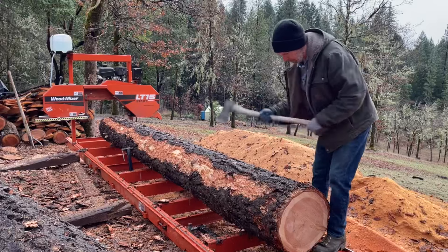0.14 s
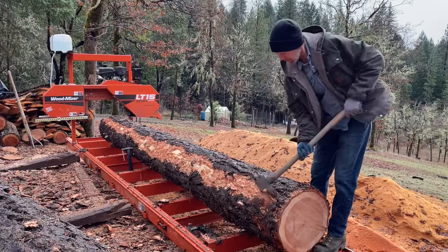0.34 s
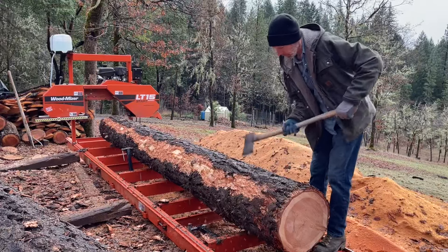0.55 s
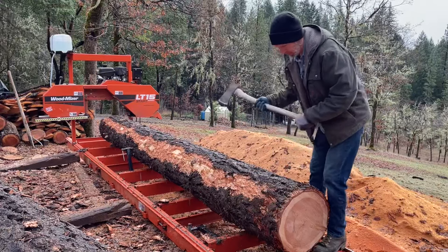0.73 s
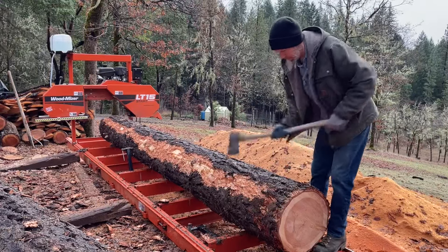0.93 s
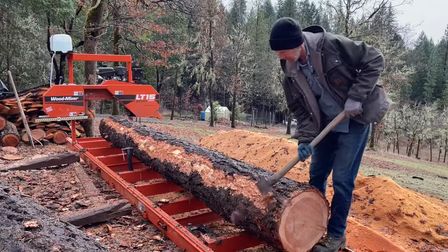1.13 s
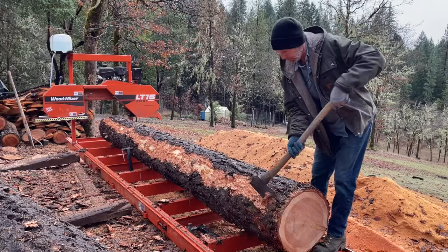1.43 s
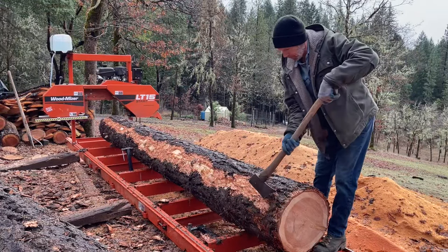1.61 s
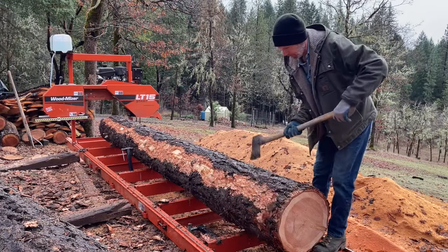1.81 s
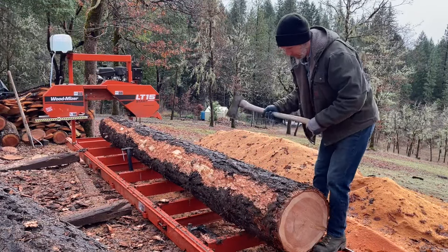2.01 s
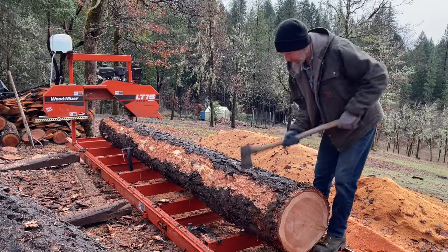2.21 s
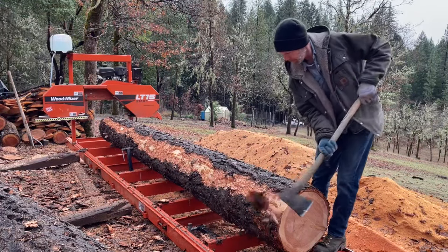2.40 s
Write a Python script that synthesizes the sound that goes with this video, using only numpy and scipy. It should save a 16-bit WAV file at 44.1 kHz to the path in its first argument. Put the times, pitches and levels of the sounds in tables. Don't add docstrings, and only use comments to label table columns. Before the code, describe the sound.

An axe chops bark off a log three times, with low ringing thuds and scattering chips

```python
import sys
import numpy as np
from scipy import signal
from scipy.fft import rfft, irfft, next_fast_len
from scipy.io import wavfile
from scipy.ndimage import uniform_filter1d, map_coordinates

SR = 44100
rng = np.random.default_rng(int(sys.argv[2]) if len(sys.argv) > 2 else 0)


def gain_from_decibels(decibels):
    exponent = np.asarray(decibels, float) / 20
    return 10 ** exponent


def transcribe(signal):
    frames = np.atleast_2d(signal).T
    limited = np.clip(frames, -1, 1)
    pcm = np.round(limited * 32767).astype(np.int16)
    wavfile.write(sys.argv[1], SR, pcm)


N = 112454


def unit(x):
    return x / np.sqrt(np.mean(x ** 2) + 1e-20)


def along(points, hz):
    f, v = np.transpose(points)
    return np.interp(np.log(hz + 1), np.log(f + 1), v)


def wobble(rate):
    knots = rng.standard_normal(int(N * rate / SR) + 4)
    return map_coordinates(knots, [np.arange(N) * rate / SR])


def filtered(x, response):
    m = next_fast_len(len(x) + 4096)
    return irfft(rfft(x, m) * response(np.fft.rfftfreq(m, 1 / SR)), m)[:len(x)]


def peak(f, hz, width_hz):
    return 1j * f * width_hz / (hz * hz - f * f + 1j * f * width_hz + 1e-9)


def add(out, s, x):
    i = max(round(s * SR), 0)
    out[i:i + len(x)] += x[:len(out) - i]


def grains(rate_per_s, size):
    hits = rng.random(size) < rate_per_s / SR
    sign = rng.choice([-1, 1], size)
    spike_db = 2.5 * np.minimum(rng.exponential(size=size), 3.5)
    return hits * sign * gain_from_decibels(spike_db)


def ringing(hz, t, waver):
    start = rng.random()
    pitch = hz * (1 + waver * wobble(40)[:len(t)])
    return np.sin(2 * np.pi * (start + np.cumsum(pitch) / SR))


def ticks(rows, t60, gain_db, sharp, tone):
    out, t = np.zeros(N), np.arange(SR // 20) / SR
    for s, db, hz in rows:
        def body(f):
            return tone * peak(f, hz, hz / sharp) * peak(f, hz, hz) + 0.5 * peak(f, hz, 2.6 * hz) ** 2
        click = filtered(rng.standard_normal(len(t)) * gain_from_decibels(-60 * t / t60), body)
        add(out, s, gain_from_decibels(db + gain_db) * click / np.abs(click).max())
    return out


# frequency in Hz, level in dB.
AIR_COLOUR = [(12, -41.5), (30, -6), (169, -8), (258, -13.5), (750, -17), (966, -20), (8170, -38.5),
              (14300, -48.5), (16200, -63)]


def air():
    sway = gain_from_decibels(wobble(4))
    return gain_from_decibels(-61) * sway * unit(filtered(rng.standard_normal(N), lambda f: gain_from_decibels(along(AIR_COLOUR, f))))


# centre in seconds, level in dB, length in seconds.
SLEEVE_MOVES = [
    (0.034, -58.5, 0.24),
    (0.147, -66, 0.089),
    (0.592, -64.5, 0.064),
    (0.691, -56, 0.15),
    (0.891, -60.5, 0.14),
    (1.648, -62.5, 0.13),
    (1.74, -75, 0.051),
    (1.963, -60, 0.089),
    (2.031, -60.5, 0.045),
    (2.114, -65, 0.073),
]
# frequency in Hz, level in dB.
CLOTH_COLOUR = [(180, -44), (300, -0.5), (603, -8.5), (1100, -11), (1390, -10), (7320, -24), (16000, -36)]


def jacket():
    t = np.arange(N) / SR
    moves = sum(gain_from_decibels(db) * np.exp(-((t - s) / length * 2) ** 2) for s, db, length in SLEEVE_MOVES)
    uneven = gain_from_decibels(3.5 * wobble(40) + 3.3 * wobble(140))
    rub = unit(filtered(rng.standard_normal(N), lambda f: gain_from_decibels(along(CLOTH_COLOUR, f))))
    tick = gain_from_decibels(-60 * np.arange(400) / SR / 0.008)
    fuzz = np.zeros(N)
    for hz in (2200, 4000, 6500, 8500, 12000):
        bursts = np.convolve(abs(grains(25, N)), tick)[:N] * rng.standard_normal(N)
        fuzz += filtered(bursts, lambda f: peak(f, hz, hz / 2) ** 2)
    return moves * uneven * rub + gain_from_decibels(-20) * (moves + gain_from_decibels(-65.5)) * unit(fuzz)


# centre in seconds, level in dB, frequency in Hz, length in seconds.
FLAPS_AND_BUMPS = [(0.093, -37, 593, 0.004), (0.117, -48, 80, 0.07), (0.279, -33.5, 50, 0.052),
                   (0.412, -48.5, 417, 0.0072), (0.668, -43.5, 78.8, 0.067), (0.724, -52, 91, .04),
                   (0.871, -47, 87.4, 0.065), (.872, -45, 700, 0.0048), (0.919, -44, 50, 0.055),
                   (1.5, -56, 91, 0.052), (1.652, -51.5, 120, 0.037), (1.683, -53.5, 200, 0.011),
                   (1.893, -51.5, 124.2, 0.03), (1.932, -47.5, 106.4, 0.027), (1.973, -53, 199, 0.028),
                   (2.153, -61.5, 880, 0.043), (2.213, -55.5, 90.3, 0.052), (2.381, -42, 55.3, 0.055),
                   (2.412, -52, 615, 0.015), (1.257, -51, 307, 0.015), (1.421, -54, 110, 0.11),
                   (0.378, -55, 65, 0.13), (0.179, -47.5, 150, .04), (1.393, -45, 380, 0.015)]


def flaps():
    half_s = 1 / 8
    out, t = np.zeros(N), np.arange(SR // 4) / SR - half_s
    for s, db, hz, length in FLAPS_AND_BUMPS:
        noise = filtered(rng.standard_normal(len(t)), lambda f: peak(f, hz, hz * 1.76) ** 2)
        puff = unit(noise) * np.exp(-(t / length * 2) ** 2)
        cut = max(round((half_s - s) * SR), 0)
        add(out, s - half_s, gain_from_decibels(db) * puff[cut:])
    return out


# start in seconds, peak level in dB, frequency in Hz.
FALLING_CRUMBS = [(.016, -49.5, 5970), (.034, -49, 7500), (.062, -45.5, 6000), (.0916, -49.5, 1646),
                  (.142, -44, 7500), (.1261, -51.5, 7400), (.177, -45, 6500), (.2405, -31.5, 8500),
                  (.273, -30, 6820), (.3263, -40, 6980), (.3496, -29.5, 5710), (.525, -59, 8500),
                  (.5596, -48, 8980), (.6464, -53, 9000), (.8534, -51.5, 6340), (.8898, -49.5, 8000),
                  (.608, -42.5, 2480), (.6393, -50, 7430), (.6938, -44.5, 4370), (.7695, -39, 2780),
                  (.7883, -54.5, 7440), (.869, -61.5, 1590), (.939, -39, 4875), (1.044, -46.5, 4500),
                  (1.2471, -37.5, 5500), (1.5354, -50, 3200), (1.5606, -53, 2820), (1.5969, -49, 3300),
                  (1.5822, -56, 4190), (1.65, -51.5, 6240), (1.731, -54, 3570), (1.9093, -48.5, 3480),
                  (1.936, -53, 4400), (1.989, -57, 4400), (1.9564, -46.5, 6940), (1.9682, -41.5, 2990),
                  (2.02, -43, 2500), (2.0583, -54, 5930), (2.12, -52, 3510), (2.162, -51.5, 4350),
                  (2.371, -47.5, 4000)]


def crumbs():
    return ticks(FALLING_CRUMBS, t60=0.011, gain_db=2, sharp=2.5, tone=0.65)


# start in seconds, length in seconds, level in dB, fall over that length in dB, centre in Hz.
CHIP_SHOWERS = [
    (0.238, 0.13, -49.5, 12, 2437),
    (0.972, 0.12, -50.5, 9.5, 2000),
    (2.261, 0.091, -54.5, 12, 2200),
    (2.363, 0.043, -60, 1.5, 2650),
    (1.243, 0.036, -51.5, 19.5, 1800),
    (1.318, 0.094, -51.5, 7, 3293),
    (1.336, 0.074, -49, 2, 700),
    (1.412, 0.088, -58.5, 4, 1300),
    (1.457, 0.061, -54.5, 20, 2770),
]


def showers():
    n = SR // 4
    out, t = np.zeros(N), np.arange(n) / SR
    for s, length, db, fall_db, hz in CHIP_SHOWERS:
        bits = np.zeros(n)
        for c in hz * np.exp(0.9 * np.arange(-1, 2)):
            bits += filtered(grains(4000 / 3, n), lambda f: peak(f, c, c / 2.5) * peak(f, c, c))
        hiss = filtered(rng.standard_normal(n), lambda f: peak(f, hz / 2, 3 * hz) * peak(f, hz, 4 * hz))
        onset = np.clip(t / 0.0058, 0, 1)
        ending = gain_from_decibels(-np.maximum(t - length, 0) * 600)
        add(out, s, gain_from_decibels(db - fall_db * t / length) * onset * ending * (unit(bits) + unit(hiss)))
    return out


# start in seconds, level in dB.
BLADE_TAPS = [
    (1.248, -38.5),
    (1.2626, -40),
    (1.293, -52.5),
]
# frequency in Hz, level in dB, t60 in seconds.
HEAD_MODES = [(420, -7, 0.027), (536, -14.5, 0.17), (960, -4.5, 0.087), (1023, -9, 0.14)]


def tap():
    out, t = np.zeros(N), np.arange(SR // 4) / SR
    for s, tap_db in BLADE_TAPS:
        ring = sum(gain_from_decibels(tap_db + db - 60 * t / t60) * ringing(hz, t, 0.019) for hz, db, t60 in HEAD_MODES)
        add(out, s, ring * (1 - np.exp(-t / 0.0011)))
    return out


# start in seconds, peak level in dB, frequency in Hz.
BARK_SNAPS = [(1.2478, -37, 2447), (1.3036, -46, 5500), (1.3283, -35, 3640), (1.3398, -20, 3390),
              (1.3406, -16, 3367), (1.3455, -37, 3600), (1.3483, -31, 3340), (1.3563, -19, 3280),
              (1.3605, -22, 3000), (1.3652, -28, 5000), (1.372, -33, 3410), (1.3812, -29.5, 1950),
              (1.386, -24.5, 3320), (1.3918, -23.5, 2010), (1.399, -20, 2920), (1.403, -31, 3090),
              (1.4062, -30, 2920), (1.4645, -35, 2930), (1.472, -37.5, 3500), (1.486, -37.5, 3350),
              (1.49, -35, 3180), (1.509, -42, 3500)]


def snaps():
    return ticks(BARK_SNAPS, t60=0.005, gain_db=0, sharp=5, tone=1.3)


def blade(snapping):
    hz, width_hz, level_db = 995, 220, -13 + 18
    return gain_from_decibels(level_db) * filtered(np.abs(snapping), lambda f: peak(f, hz, width_hz) * peak(f, hz, hz))


# frequency in Hz, t60 in seconds, then level in dB after the first, second and third chop.
LOG_MODES = [(50, 0.26, -39.5, -35, -33.5), (75.4, 0.2, -28.5, -26, -28.5), (165, 0.22, -17, -31.5, -28),
             (200.3, 0.06, -20.5, -43.5, -9), (269.2, 0.21, -26, -20, -31.5), (382, 0.13, -27.5, -23, -40),
             (455, 0.22, -38, -38, -42), (700, 0.079, -34, -26.5, -40)]
RING_STARTS = [
    .214,
    0.964,
    2.251,
]
BED_LINGER_DB = [-9.5, -4, -5]


def log():
    bed_hz, linger = 180, 3.4
    sag, sag_s = 0.12, 0.012
    out, t = np.zeros(N), np.arange(SR * 2 // 3) / SR
    for k, s in enumerate(RING_STARTS):
        for hz, t60, *levels in LOG_MODES:
            in_bed = hz < bed_hz
            fade = gain_from_decibels(-60 * t / t60) + in_bed * gain_from_decibels(BED_LINGER_DB[k] * 165 / hz - 60 * t / t60 / linger)
            swell_cycles = 0.64 * (2.1 if in_bed else 1)
            swell = (1 - np.exp(-t * hz / swell_cycles)) ** 2
            beating = gain_from_decibels(3 * abs(np.log2(hz / 165)) * wobble(45)[:len(t)])
            tone = ringing(hz * (1 + sag * np.exp(-t / sag_s)), t, 0.01 * hz / 100)
            add(out, s, gain_from_decibels(levels[k]) * fade * swell * beating * tone)
    return out


# start in seconds, peak level in dB, frequency in Hz, t60 in seconds.
WOOD_KNOCKS = [(.2092, -9.5, 727, 0.012), (0.2091, -12.5, 376, 0.037), (.2115, -16, 1100, 0.011),
               (0.2136, -2, 788, .012), (.2143, -5, 1834, .02), (.2142, -17.5, 3480, 0.014),
               (.9568, -21.5, 1926, .03), (.9638, -5.5, 1498, 0.017), (.9642, -9.5, 2008, 0.025),
               (.965, -12, 370, 0.027), (.968, -11, 716, 0.034), (.9685, -14, 4480, 0.009),
               (.9715, -19, 659, 0.046), (2.2362, -10.5, 2130, 0.0085), (2.2364, -13, 747, 0.04),
               (2.237, -19.5, 341, 0.042), (2.2497, -19, 420, 0.036), (2.2485, -15, 1885, 0.016),
               (2.2495, -18.5, 5000, .012), (2.2545, -17.5, 1910, .03), (2.2555, -16.5, 3080, .015),
               (2.2615, -20.5, 6260, .015)]


def knocks():
    out, t = np.zeros(N), np.arange(SR // 10) / SR
    for s, db, hz, t60 in WOOD_KNOCKS:
        rise = 1 - np.exp(-t * hz / 0.3)
        add(out, s, -gain_from_decibels(db - 60 * t / t60) * np.sin(2 * np.pi * hz * t) * rise)
    return out


# start in seconds, level in dB, brightness in dB, t60 in seconds, depth of the wood tone in dB.
FRACTURES = [(.2075, -20, 0, 0.057, -3), (.2095, -21, 2.5, 0.041, -1), (.2141, -16.5, 8, 0.024, 3.5),
             (.221, -29.5, 11, 0.046, 0.5), (.9565, -23.5, -3, 0.054, 0.5), (0.9634, -17.5, 1.5, 0.034, -1),
             (0.9686, -23, 13.5, 0.013, -7.5), (0.973, -21.5, -2.5, 0.014, 7),
             (2.2355, -18.5, -3.5, 0.037, 2), (2.241, -24.5, 0, 0.02, -0.5), (2.248, -20, 6.5, 0.06, -0.5),
             (2.255, -22, -1.5, 0.026, -1), (2.264, -32.5, 10, 0.017, -6.5)]
# frequency in Hz, width in Hz, level in dB.
BARK_MODES = [(385, 200, -4.5), (772, 200, 5.5), (1522, 280, 1.5), (1880, 260, 6), (3410, 530, -7.5),
              (4480, 740, -4.5)]
# frequency in Hz, level in dB.
CRACK_COLOUR = [(120, -27.5), (200, -3.5), (735, -7.5), (1230, -15), (1870, -8), (2470, -7), (6400, -16.5),
                (16000, -34)]


def chops():
    out, t = np.zeros(N), np.arange(SR // 8) / SR
    for s, db, bright_db, t60, deep_db in FRACTURES:
        def bark(f):
            total = 0
            for k, (hz, width_hz, level_db) in enumerate(BARK_MODES):
                tilt_db = -deep_db * np.log2(hz / 700) ** 2
                total = total + (-1) ** k * gain_from_decibels(level_db + tilt_db) * peak(f, hz, width_hz)
            return total

        def splinter(f):
            return gain_from_decibels(along(CRACK_COLOUR, f) + bright_db * np.log2(f / 2000 + 0.14) / 2)

        decay = gain_from_decibels(-60 * t / t60)
        noise = rng.standard_normal(len(t))
        grit_db = 3.5 * uniform_filter1d(rng.standard_normal(len(t)), size=16) * 1.8
        burst = noise * gain_from_decibels(grit_db) * decay * (1 - np.exp(-t / 0.00065))
        body, fizz = filtered(burst, bark), filtered(burst, splinter)
        mix = body / np.linalg.norm(body) + gain_from_decibels(-5.5 + bright_db) * fizz / np.linalg.norm(fizz)
        add(out, s, gain_from_decibels(db) * np.linalg.norm(decay) * mix)
    return out


# frequency in Hz, t60 in seconds.
YARD_DECAY = [(200, 1), (2000, 0.13), (10000, 0.08)]


def yard(x):
    hz, t, z = signal.stft(rng.standard_normal(SR // 3), SR, nperseg=256)
    fade = gain_from_decibels(-60 * t / along(YARD_DECAY, hz)[:, None])
    tail = signal.istft(z * fade, SR, nperseg=256)[1]
    return signal.fftconvolve(x, tail / np.linalg.norm(tail))[:N]


def scene():
    snapping = snaps()
    axe = chops() + knocks() + snapping + blade(snapping)
    rest = tap() + log() + showers() + crumbs() + flaps() + jacket() + air()
    return (axe + gain_from_decibels(-25) * yard(axe) + rest)[None]


def band_limit(x):
    return signal.sosfilt(signal.butter(12, 16820, fs=SR, output="sos"), x)


def record(dry):
    mic_hz, cut_hz, ceiling = 13000, 16300, 1.1
    x = filtered(dry[0], lambda f: 1 / np.sqrt(1 + (f / mic_hz) ** 6 + (f / cut_hz) ** 60))
    soft = x / (1 + np.abs(x / ceiling) ** 8) ** (1 / 8)
    return band_limit(soft[None])


dry = scene()
out = record(dry)
transcribe(out)
```